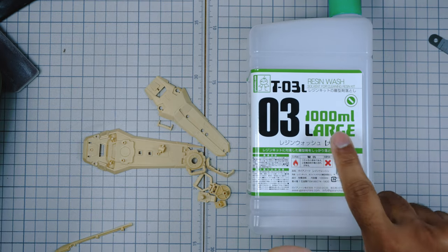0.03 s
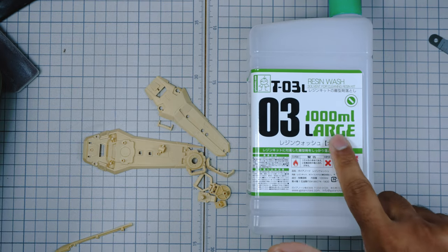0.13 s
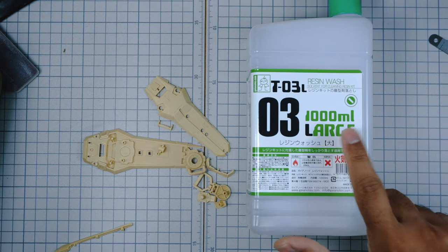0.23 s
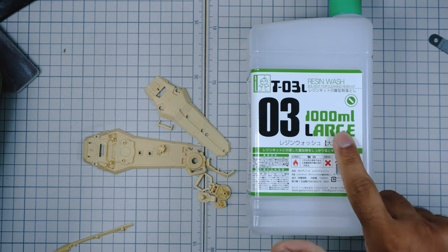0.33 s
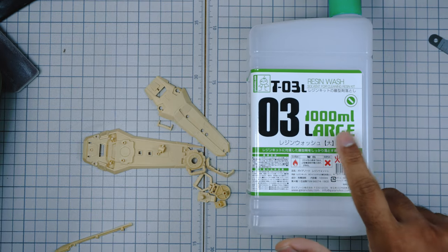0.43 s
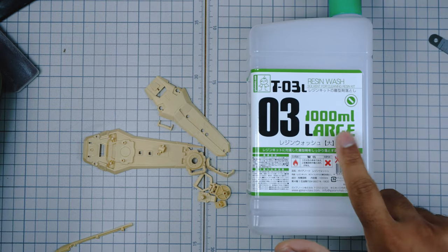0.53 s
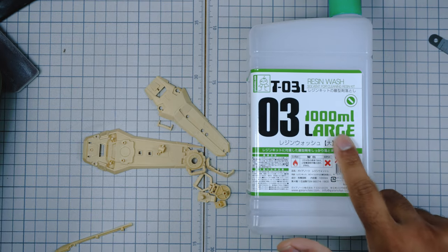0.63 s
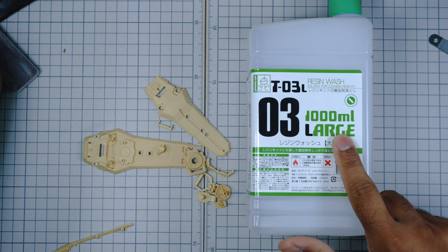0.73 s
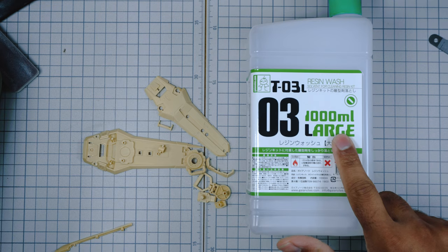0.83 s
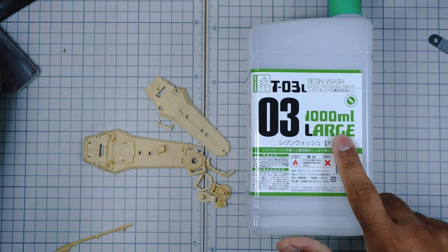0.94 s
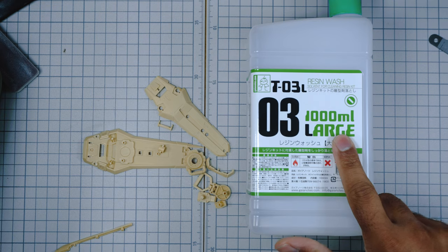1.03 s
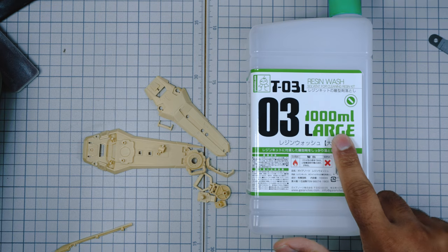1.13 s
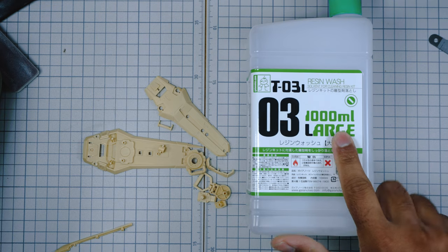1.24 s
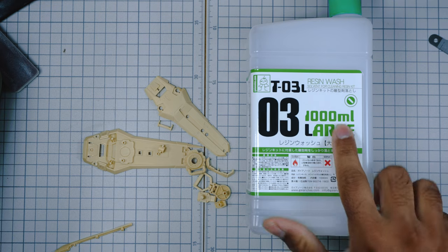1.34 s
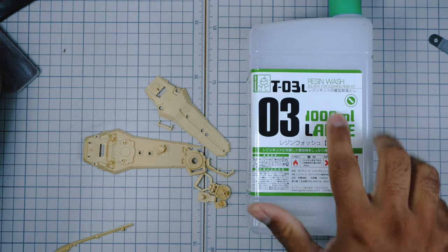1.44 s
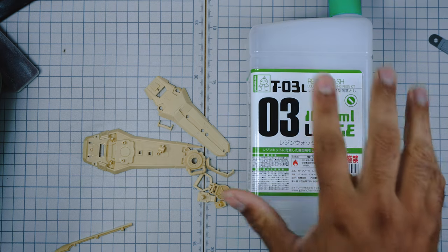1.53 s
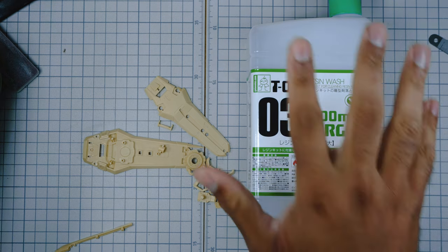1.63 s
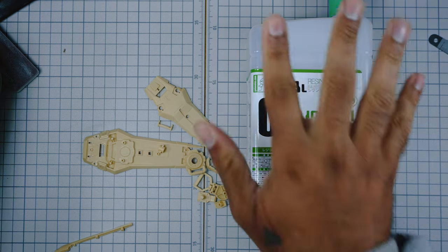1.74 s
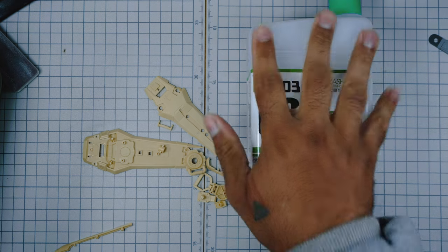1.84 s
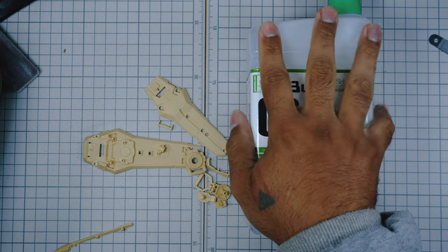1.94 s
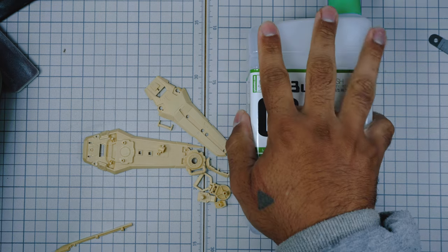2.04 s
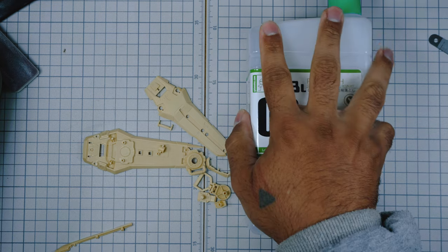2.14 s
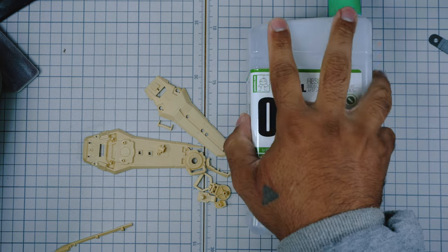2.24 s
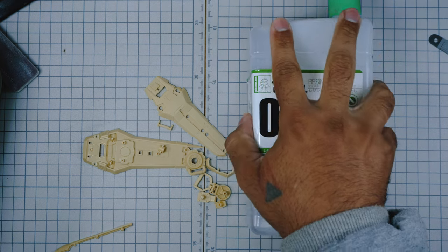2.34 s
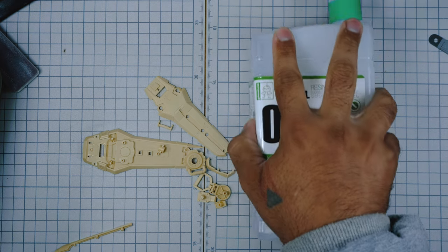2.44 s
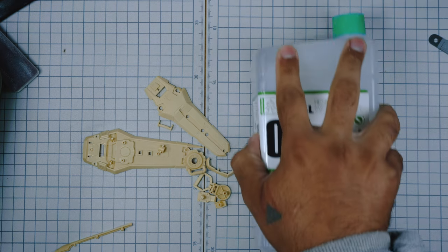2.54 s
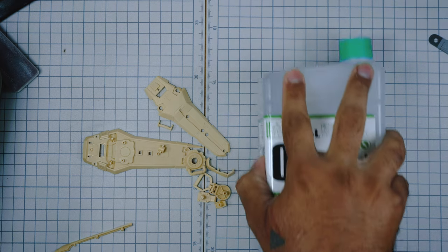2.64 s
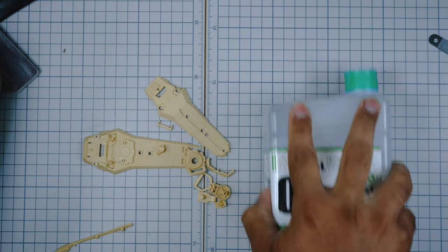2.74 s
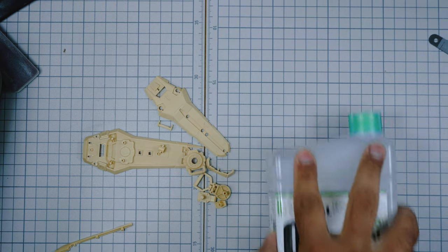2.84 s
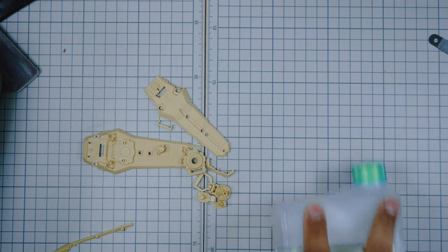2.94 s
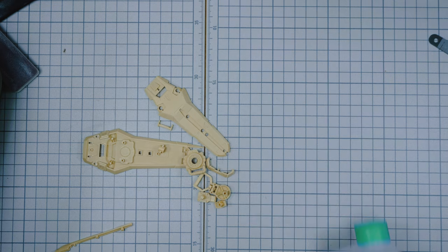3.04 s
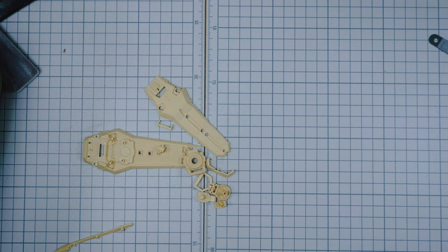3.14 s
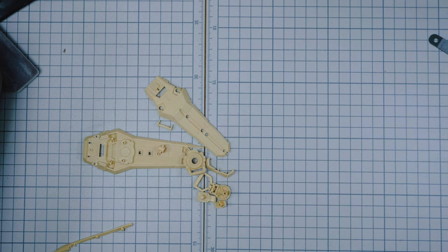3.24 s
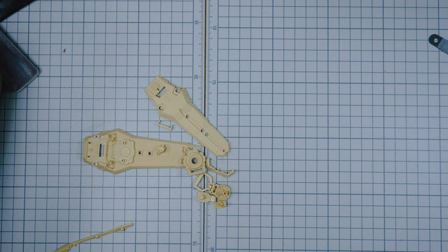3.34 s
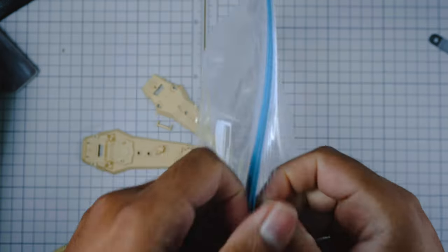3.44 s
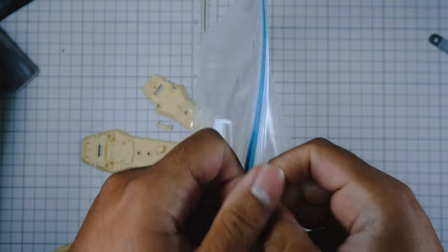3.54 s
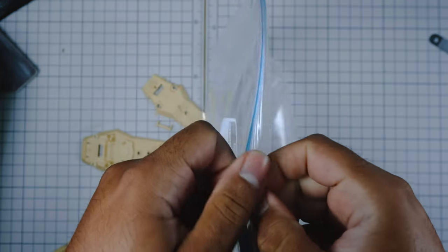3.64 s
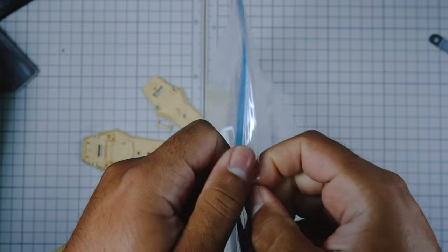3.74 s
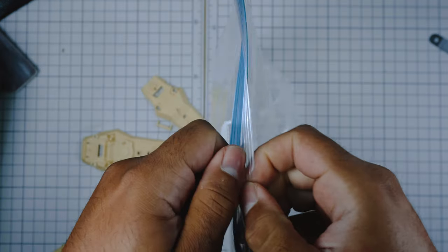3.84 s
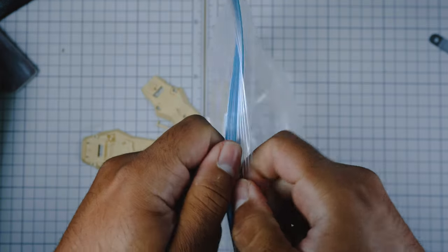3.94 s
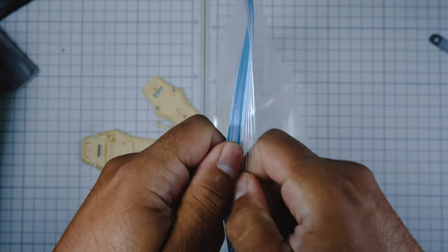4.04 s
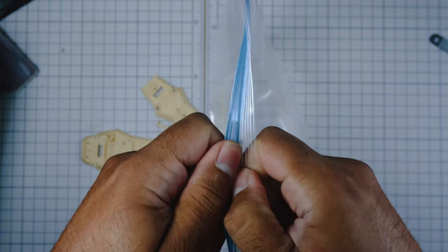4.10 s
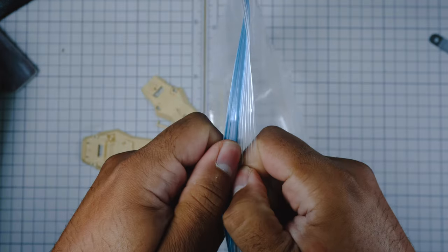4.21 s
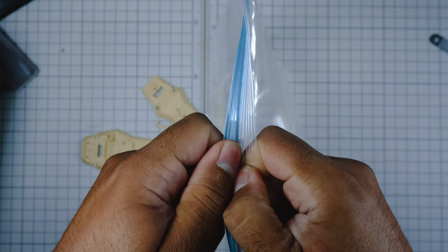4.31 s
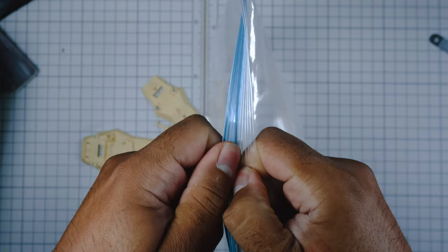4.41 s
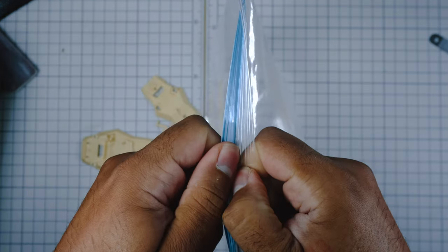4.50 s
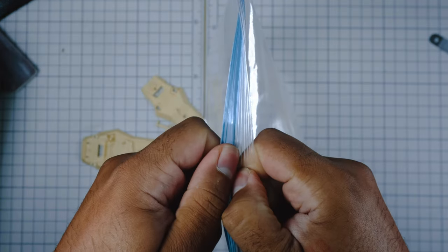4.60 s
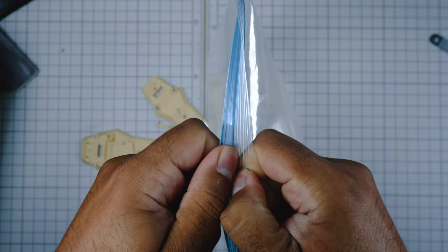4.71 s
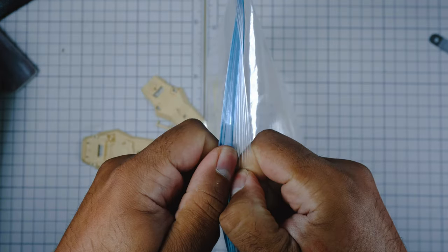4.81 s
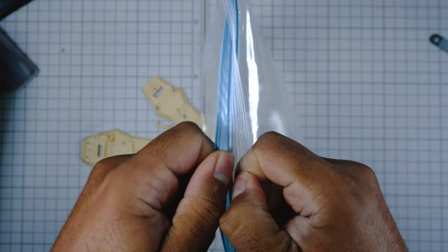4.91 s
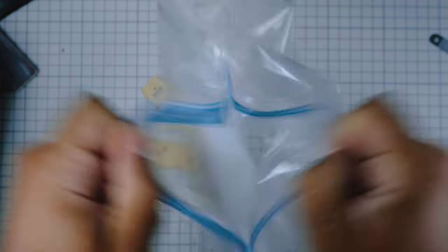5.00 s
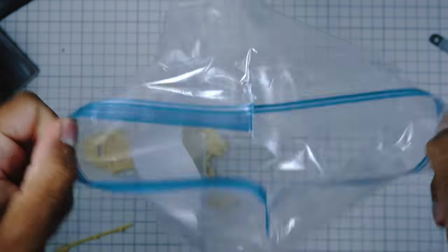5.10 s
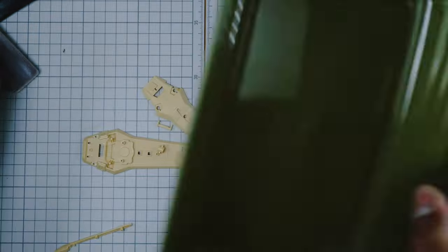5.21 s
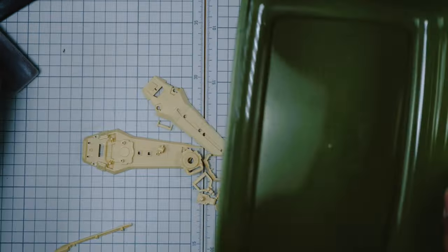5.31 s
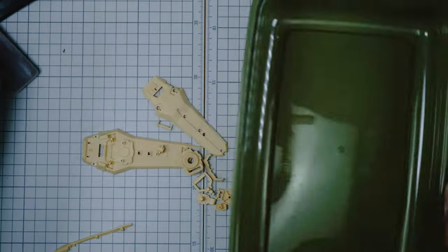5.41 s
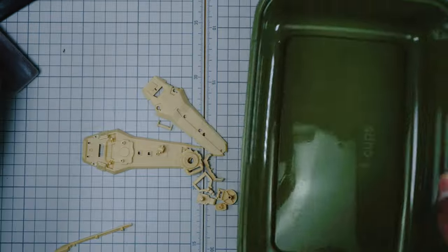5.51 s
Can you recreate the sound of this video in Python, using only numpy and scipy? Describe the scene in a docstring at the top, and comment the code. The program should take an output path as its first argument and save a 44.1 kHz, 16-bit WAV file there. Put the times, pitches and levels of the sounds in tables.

```python
"""Bottle and zip bag on a work table

Close up, a finger taps a full plastic bottle four times; a hand lands on it, the liquid heaves, and
the base scrapes away over a cutting mat. Fingers pick at a plastic zip bag, pull its seal open in one
rip of tiny snaps, then swing a tray in. Blows rock the table; a fan and mains hum sit low
in a small room."""
import sys
import numpy as np
from scipy import signal
from scipy.fft import rfft, irfft
from scipy.io import wavfile

SR = 44100
rng = np.random.default_rng(int(sys.argv[2]) if len(sys.argv) > 2 else 0)


def unload_wav(signal):
    """Save mono or channel-first audio to the path in sys.argv[1] as 16-bit WAV at rate SR, clipped to [-1, 1]."""
    wavfile.write(
        sys.argv[1],
        SR,
        np.round(np.clip(np.atleast_2d(signal).T, -1, 1) * 32767).astype(np.int16),
    )


N = 245195
TIME = np.arange(N) / SR


def gain_of(db):
    """Decibels to amplitude."""
    return 10 ** (np.asarray(db) / 20)


def unit_rms(x):
    """Scaled to rms 1."""
    return x / np.sqrt(np.mean(x ** 2) + 1e-20)


def unit_energy(x):
    """Scaled to energy 1."""
    return x / np.linalg.norm(x)


def value_at(points, hz):
    """A spectrum's value at hz, on a log-frequency axis."""
    freqs, values = np.transpose(points)
    return np.interp(np.log(hz + 1), np.log(freqs), values)


def envelope(rows):
    """Gain through (time_s, level_db) points, silent outside them."""
    times, levels = np.transpose(rows)
    return gain_of(np.interp(TIME, times, levels, left=-140, right=-140))


def strokes(rows, column=2):
    """Gain of strokes that swell to the level in one column and are 10 dB down at their ends."""
    swells_db = (row[column] - 10 * np.minimum((2 * (TIME - row[0]) / row[1]) ** 2, 20) for row in rows)
    return np.sqrt(sum(gain_of(db) ** 2 for db in swells_db))


def rise_to(s, db_per_s):
    """A steady rise that reaches gain 1 at s."""
    return gain_of(-db_per_s * np.maximum(s - TIME, 0))


def fade_after(s, db_per_s):
    """Gain 1 until s, then a steady fall."""
    return gain_of(-db_per_s * np.maximum(TIME - s, 0))


def add(mix, s, sound):
    """Mixes a sound in at time s."""
    part = mix[round(s * SR):][:len(sound)]
    part += sound[:len(part)]


def click(colour, size=4096):
    """The sharpest causal pulse with this spectrum."""
    hz = abs(np.fft.fftfreq(size, 1 / SR))
    log_gain = np.log(gain_of(value_at(colour, hz)))
    minimum_phase = np.exp(np.conj(signal.hilbert(log_gain)))
    return unit_energy(np.fft.ifft(minimum_phase).real[:size // 2])


def coloured(x, colour):
    """Passes x through a spectrum."""
    return signal.oaconvolve(x, click(colour))[:len(x)]


def noise(colour):
    """Steady coloured noise, rms 1."""
    return unit_rms(coloured(rng.standard_normal(N), colour))


def ring(modes):
    """Damped modes struck at once."""
    t = TIME[:SR // 2]
    return sum(gain_of(db - 60 * t / t60) * np.sin(2 * np.pi * hz * t) for hz, db, t60 in modes)


def cushioned(x, samples):
    """A soft contact spreads a blow in time and dulls it."""
    pad = signal.windows.hann(samples)
    return np.convolve(x, pad / pad.sum())


def burst(t60, size=2048):
    """A dying puff of noise, energy 1."""
    return unit_energy(rng.standard_normal(size) * gain_of(-60 * TIME[:size] / t60))


def friction(colour, per_s, spread_db, smooth):
    """Micro-slips of uneven size over a smooth hiss, rms 1."""
    slips = (rng.random(N) < per_s / SR) * rng.choice([-1, 1], N)
    sizes = gain_of(spread_db * np.minimum(rng.exponential(1, N), 4))
    return unit_rms(coloured(unit_rms(slips * sizes) + smooth * rng.standard_normal(N), colour))


def drift(rate_hz):
    """Slow random wander, rms 1."""
    hz = np.fft.rfftfreq(N, 1 / SR)
    return unit_rms(irfft(rfft(rng.standard_normal(N)) * np.exp(-(hz / rate_hz) ** 2), N))


# Low rush of the fan: freq_hz, gain_db
FAN_COLOUR = [(20, -1), (45, -12), (75, -5), (100, -1), (150, -9.5), (240, -5), (400, -14), (800, -22),
              (1600, -29.5), (2500, -37), (4200, -37), (7000, -42), (16000, -50)]
# Thin, high band of hiss: freq_hz, gain_db
WHINE_COLOUR = [(4500, -46.5), (5850, -11), (6150, -6.5), (6350, -3.5), (6700, -16.5), (8000, -47.5)]
# Tones of the hum: pitch_hz, level_db
HUM_TONES = [(33, -57.5), (59.3, -56), (97.5, -65.5), (118.4, -64), (226, -70.5)]


def room_tone():
    """A bed of fan noise, faint whine and wavering mains hum."""
    fan = gain_of(-58) * noise(FAN_COLOUR)
    whine = gain_of(-85.5) * noise(WHINE_COLOUR)
    hum = np.zeros(N)
    for hz, db in HUM_TONES:
        phase = 2 * np.pi * (hz * TIME + rng.random()) + 0.19 * drift(rate_hz=2.7)
        hum += gain_of(db) * np.sqrt(2) * np.sin(phase)
    return fan + whine + hum


def table_sway(rate_hz=16, t60=2.3):
    """The table never quite rests on its legs; each blow pushes it down and sets it rocking."""
    rocking = -np.sin(2 * np.pi * rate_hz * TIME)
    kick = rocking * gain_of(-60 * TIME / t60)
    out = gain_of(-57.5) * rocking
    for s, thud_db, _ in FINGER_TAPS:
        add(out, s, gain_of(thud_db - 38) * kick)
    add(out, HAND_HITS[0][0], gain_of(-45) * kick)
    return out


# Four firm taps and three light touches: start_s, thud_db, tick_db
FINGER_TAPS = [(0.1324, -4, -10), (0.193, -18.5, -44), (0.3187, -0.5, -0.5), (0.5060, 0, -3.5),
               (0.5609, -17.5, -47), (0.6913, 1.5, -5), (1.244, -18, -45)]
# Bright tick of the nail: freq_hz, gain_db
NAIL_COLOUR = [(100, -16), (600, -27), (850, -23), (1200, -5.5), (2450, 3), (3300, -6.5), (4400, -4.5),
               (7500, -14.5), (9500, -15), (11500, -14), (13500, -18), (16000, -22)]
# Ring of the label face and the table under it: pitch_hz, level_db, t60_s
THUD_MODES = [(74.3, -5, 0.51), (142, -4.5, 0.076), (184, -1.5, 0.036), (252, -8.5, 0.13), (312, 4, 0.017),
              (425, -4.5, .07), (512, -23, 0.27), (574, -16, 0.15), (737, -8, 0.036), (1046, -10, 0.023),
              (1240, -2, 0.02), (1300, -24, 0.023), (1540, -6.5, 0.024), (1860, -13, 0.04),
              (2260, -8, 0.018), (4130, -11, 0.012), (5200, -13, 0.013)]


def bottle_taps():
    """The nail ticks and the liquid-damped face rings briefly; the soft fingertip presses in just after."""
    thud = gain_of(-35) * -ring(THUD_MODES)
    tick = gain_of(-16.5) * click(NAIL_COLOUR)
    press = gain_of(-9.5) * cushioned(thud, samples=96)
    out = np.zeros(N)
    for s, thud_db, tick_db in FINGER_TAPS:
        add(out, s, gain_of(tick_db) * tick)
        add(out, s, gain_of(thud_db) * thud)
        add(out, s + 0.00429, gain_of(thud_db) * press)
    return out


# Skin and sleeve stroking the bottle: middle_s, length_s, brush_db, swish_db
SKIN_STROKES = [(.6, 0.11, -77, -76), (1.4, 0.25, -67.5, -71), (1.9, 0.22, -59, -88),
                (1.955, 0.045, -57, -65), (2.13, 0.25, -68.5, -79), (2.25, 0.1, -64, -70),
                (3.37, 0.044, -64, -74)]
# Soft brush of skin: freq_hz, gain_db
SKIN_COLOUR = [(500, 3.5), (1800, 3), (3600, 5.5), (6000, 1), (8000, -9), (12000, -7.5), (16000, -17)]
# Finest crackle of plastic, for bottle and bag: freq_hz, gain_db
FIZZ_COLOUR = [(4000, -20), (7500, 0), (11000, -2), (14000, -3.5), (16000, -5)]


def skin_brush(hiss_stops_s=3.4):
    """Skin moving on plastic hisses, with a fine swish on top; a faint steady hiss stops abruptly."""
    faint_hiss = gain_of(-78.5) * (TIME < hiss_stops_s)
    touch = np.hypot(strokes(SKIN_STROKES), faint_hiss)
    swish = strokes(SKIN_STROKES, column=3) * friction(FIZZ_COLOUR, per_s=2500, spread_db=6, smooth=1)
    return touch * friction(SKIN_COLOUR, per_s=1500, spread_db=3, smooth=0.73) + swish


# The hand landing on the bottle: start_s, slap_db, push_db
HAND_HITS = [(1.9038, -11, -7.5), (1.9064, -5.5, 1), (1.9118, -1, -8), (1.9164, -12, -3.5)]
# Smack of skin: freq_hz, gain_db
SLAP_COLOUR = [(200, -6), (900, -11), (1800, 7.5), (2500, -6.5), (3400, 1), (5500, -10.5), (10000, -10.5),
               (16000, -19)]
# Boom of the broad wall, damped by the palm: pitch_hz, level_db, t60_s
WALL_MODES = [(98, -21, .12), (156, -28, .3), (238, -14, .1), (307, -14, .1), (385, -5, .05),
              (418, 1, .065), (511, -4, .08), (560, -11, .04), (711, -19, .06)]


def hand_landing():
    """Fingers and palm slap the wall in turn; the soft flesh pushes it and the bottle booms."""
    boom = gain_of(-24.5) * cushioned(ring(WALL_MODES), samples=48)
    out = np.zeros(N)
    for s, slap_db, push_db in HAND_HITS:
        slap = unit_energy(coloured(burst(t60=0.0092), SLAP_COLOUR))
        add(out, s, gain_of(slap_db - 6.5) * slap)
        add(out, s, gain_of(push_db) * boom)
    return out


# Swell of the liquid: time_s, level_db
SLOSH_CURVE = [(1.94, -32.5), (1.98, -32), (2.02, -36), (2.055, -34.5), (2.085, -44), (2.17, -42.5),
               (2.5, -50)]
# Its sub-bass weight: freq_hz, gain_db
SLOSH_COLOUR = [(12, -17), (30, 5.5), (60, -19), (160, -22), (350, -60), (1000, -99)]


def slosh():
    """The liquid heaves under the hand: a deep wobble after the blow."""
    return envelope(SLOSH_CURVE) * noise(SLOSH_COLOUR)


# How hard the base scrapes the mat: time_s, level_db
SCRAPE_CURVE = [(2.3, -85.5), (2.48, -71.5), (2.55, -59), (2.85, -43), (3.06, -35.5), (3.11, -41.5),
                (3.17, -39.5), (3.205, -44.5), (3.235, -39), (3.31, -55.5), (3.35, -72)]
# Hollow note of the bottle: freq_hz, gain_db
HOLLOW_COLOUR = [(120, -15), (300, -6.5), (430, 7), (640, 2.5), (760, 2), (1200, 1.5), (1500, -26.5),
                 (2000, -39.5)]
# Rasp of its base: freq_hz, gain_db
RASP_COLOUR = [(1000, -20.5), (1350, -4.5), (1450, -5), (1650, -0.5), (1820, -10.5), (2000, -10.5),
               (2600, -36.5)]
# Hiss of the mat's surface: freq_hz, gain_db
MAT_COLOUR = [(900, -22), (2000, -7), (3100, 1), (4200, -3), (5200, -3), (6800, -16), (8600, -15),
              (10500, -23), (13000, -29), (16000, -33)]
# The closing grip nudges the bottle: middle_s, length_s, level_db
GRIP_NUDGE = [(2.26, 0.23, -67.5)]


def bottle_drag(flat_until_s=2.632, leaves_mat_s=2.896):
    """The base scrapes with uneven pressure; as it lifts, the hollow note fades first, then the rasp."""
    pressure = gain_of(drift(rate_hz=29))
    scrape = envelope(SCRAPE_CURVE)
    lying_flat = gain_of(8.5) * scrape * fade_after(flat_until_s, db_per_s=43.5)
    contact = gain_of(2.5) * scrape * fade_after(leaves_mat_s, db_per_s=33) + strokes(GRIP_NUDGE)
    hollow = lying_flat * friction(HOLLOW_COLOUR, per_s=1400, spread_db=5, smooth=0.63)
    rasp = contact * friction(RASP_COLOUR, per_s=1500, spread_db=-1.5, smooth=1)
    hiss = gain_of(1) * scrape * friction(MAT_COLOUR, per_s=3700, spread_db=-1.5, smooth=0.8)
    direct = pressure * (hollow + rasp + hiss)
    # The reflection off the mat comes later as the bottle moves away.
    delay_s = np.interp(TIME, [2.5, 3.3], [0.0005, 0.0012])
    reflection = 0.13 * np.interp(TIME - delay_s, TIME, direct)
    return gain_of(-0.5) * (direct + reflection)


# Knocks along the drag: start_s, level_db, pitch_hz
MAT_BUMPS = [(2.527, -42, 230), (2.544, -42.5, 199), (2.970, -38.5, 570), (2.984, -40.5, 606),
             (3.058, -32.5, 3450), (3.23, -34, 3620), (3.292, -36.5, 1430), (3.296, -42, 405)]


def bottle_bumps():
    """The bottle bumps on the mat in short, gritty knocks."""
    out = np.zeros(N)
    for s, db, hz in MAT_BUMPS:
        knock = signal.fftconvolve(burst(t60=0.04), ring([(hz, 0, 0.008)]))
        add(out, s, gain_of(db + 23.5) * unit_energy(knock))
    return out


# Sharp crack of the bag's film: freq_hz, gain_db
SNAP_COLOUR = [(150, -36.5), (400, -7), (900, -6.5), (1600, -0.5), (3000, 3), (4500, 14), (6500, 3),
               (9000, -6), (16000, -31)]


def snaps(rows, body_db, crack_share, treble_db, ring_t60, shivers, shiver_t60):
    """Each snap cracks and jerks a few cycles from the film; the shiver changes from first to last."""
    out, crack, tick = np.zeros(N), click(SNAP_COLOUR), click(FIZZ_COLOUR)
    for (s, db, hz), shiver in zip(rows, np.linspace(*shivers, len(rows))):
        tone = ring([(hz, 0, ring_t60)])[:len(crack)]
        patch = unit_energy(signal.fftconvolve(tone, crack)[:len(crack)])
        jerk = shiver * burst(shiver_t60)
        jerk[0] += 1  # a clean impulse leads the noisy shiver
        body = signal.fftconvolve(patch + crack_share * crack, jerk)
        treble = signal.fftconvolve(tick, burst(t60=0.005))
        add(out, s, gain_of(db + body_db) * unit_energy(body))
        add(out, s, gain_of(db + treble_db) * unit_energy(treble))
    return out


def crinkles(rubbing, count=18, centre_hz=2300):
    """Small creases, likelier and louder under harder rubbing: start_s, level_db, pitch_hz."""
    shares = (np.arange(count) + rng.random(count)) / count
    times = np.interp(shares, np.cumsum(rubbing) / rubbing.sum(), TIME)
    size, pitch = rng.standard_normal((count, 2)).T
    pressed_db = 10 * np.log10(np.interp(times, TIME, rubbing) / rubbing.max())
    return list(zip(times, -52 + pressed_db + 2.7 * size, centre_hz * 2 ** (0.55 * pitch)))


# Fingers rubbing the film: middle_s, length_s, rustle_db, fizz_db
FILM_RUBS = [(3.62, .04, -59.5, -68), (3.73, 0.44, -62.5, -73), (3.718, 0.044, -55.5, -64),
             (3.812, .06, -54.5, -61.5), (3.95, .05, -53, -63), (4.0, .06, -55, -73),
             (4.088, 0.056, -57, -69), (4.2, 0.092, -68, -81), (4.42, 0.099, -66, -87),
             (4.65, .09, -70, -79), (4.958, .024, -61.5, -83), (5.2, .055, -56.5, -68)]
# Midrange rustle of the film: freq_hz, gain_db
RUSTLE_COLOUR = [(300, -22), (700, -3.5), (1300, -2.5), (2500, -5), (4500, -4.5), (6500, -10.5),
                 (9000, -26)]
# The loudest crease pops: start_s, level_db, pitch_hz
CREASE_POPS = [(3.504, -50.5, 1400), (3.7088, -60, 1500), (3.7867, -46.5, 4200), (3.8155, -47, 2950),
               (3.888, -47, 4770), (3.9924, -49.5, 2620), (4.0302, -49, 2530), (4.0755, -45, 4000),
               (4.0909, -45.5, 4400), (4.1287, -50.5, 2800), (4.3527, -52, 1880), (4.372, -48, 2750),
               (4.4232, -57, 2700), (4.574, -52, 1550), (4.666, -56, 1696), (5.1827, -32.5, 5200),
               (5.1919, -32.5, 2830)]


def bag_fumbling():
    """Fingers feel for the lips of the bag: the film rustles and its creases pop."""
    rubbing = strokes(FILM_RUBS)
    rustle = gain_of(0.5) * rubbing * friction(RUSTLE_COLOUR, per_s=660, spread_db=3, smooth=0.88)
    fizz = strokes(FILM_RUBS, column=3) * friction(FIZZ_COLOUR, per_s=900, spread_db=3.2, smooth=0.9)
    grip = gain_of(2.3 * drift(rate_hz=55))  # the film sticks and slips in clumps
    pops = snaps(crinkles(rubbing) + CREASE_POPS, body_db=19, crack_share=0.76, treble_db=2,
                 ring_t60=0.0014, shivers=(2.4, 1.0), shiver_t60=0.028)
    return grip * (rustle + fizz) + pops


# The seal giving way in lurches: start_s, level_db, length_s
SEAL_LURCHES = [(4.968, -22.5, 0.0029), (4.9748, -20, .002), (4.9783, -14, .003), (4.9853, -11.5, 0.0028),
                (4.9948, -12, .004), (5.0012, -17, .008), (5.0122, -17.5, 0.0047), (5.016, -15.5, 0.0066),
                (5.033, -17, 0.01), (5.0458, -16.5, .004), (5.056, -21, 0.0031), (5.0615, -17, 0.0032),
                (5.0685, -13, 0.0061), (5.08, -16, 0.0061), (5.091, -14.5, .002), (5.1011, -17, .004),
                (5.1111, -18.5, 0.015), (5.124, -23, 0.0045), (5.1373, -23, 0.0015)]
# Short ringing tones that colour the rip's snaps: pitch_hz, level_db, t60_s
RIP_TONES = [(1010, -2.5, .045), (1694, 2.5, .12), (2700, -7.5, 0.11), (2930, 5, .05), (3920, -3.5, 0.063)]


def seal_rip(pulls_s=(4.965, 5.06), taut_hz=4320, slack_octaves_per_s=9.2):
    """Each lurch of the seal frees a fading run of snaps, coloured by short ringing tones."""
    count, gap_s, jitter_s = 5, 0.002, 0.00043
    rows = []
    for start, db, length in SEAL_LURCHES:
        jitter, pitch = rng.standard_normal((2, count))
        after_s = abs(np.arange(count) * gap_s + jitter_s * (jitter - jitter[0]))
        fade_db = 10.5 * np.minimum(after_s / length, 2) ** 2
        # Each pull draws the film taut; the pitch sinks as it slackens.
        since_pull_s = start - max([s for s in pulls_s if s <= start], default=start)
        hz = taut_hz * 2 ** (0.12 * pitch - slack_octaves_per_s * since_pull_s)
        rows += zip(start + after_s, db - fade_db, hz)
    seal = snaps(rows, body_db=18.5, crack_share=1.18, treble_db=11,
                 ring_t60=0.002, shivers=(0.5, 1.8), shiver_t60=0.008)
    tones = gain_of(-25) * signal.fftconvolve(seal, unit_energy(ring(RIP_TONES)))[:N]
    return seal + tones


# Flutter of slack film: freq_hz, gain_db
FLUTTER_COLOUR = [(400, -21.5), (950, 7), (1300, -4), (1650, 3.5), (2100, -6.5), (2900, 2.5), (4200, -1),
                  (6500, -9), (10000, -11), (16000, -22)]
# Low whoosh of air, for bag and tray: freq_hz, gain_db
AIR_COLOUR = [(50, -0.5), (110, 4.5), (180, -2.5), (300, 5.5), (500, -3), (900, -13), (1500, -30.5)]


def bag_opening(parts_s=4.988, wide_s=5.123):
    """The slackening film flutters and the widening mouth puffs air; both die once it is wide open."""
    opening = rise_to(parts_s, db_per_s=901.5)
    shake = gain_of(-27.5) * rise_to(wide_s, db_per_s=14) * fade_after(wide_s, db_per_s=390)
    puff = gain_of(-32) * rise_to(wide_s, db_per_s=124) * fade_after(wide_s, db_per_s=480)
    flutter = shake * friction(FLUTTER_COLOUR, per_s=1800, spread_db=7, smooth=0.51)
    air = puff * friction(AIR_COLOUR, per_s=560, spread_db=6.5, smooth=0.65)
    return opening * (flutter + air)


# Pass of the tray: middle_s, length_s, level_db
TRAY_PASS = [(5.39, .36, -64)]


def tray_swing():
    """A tray swung in over the table stirs the air."""
    return strokes(TRAY_PASS) * friction(AIR_COLOUR, per_s=560, spread_db=6.5, smooth=0.65)


# Short tail of the small room: freq_hz, t60_s
ROOM_DECAY = [(150, 0.303), (400, 0.24), (1000, 0.14), (2800, 0.18), (7000, 0.096), (16000, 0.021)]


def room_reverb(x, size=16384):
    """Dense reflections from close walls, the treble dying first."""
    echoes = rng.standard_normal(size) * (TIME[:size] > 0.004)
    hz, t, spectra = signal.stft(echoes, SR, nperseg=256)
    decay = gain_of(-60 * t / value_at(ROOM_DECAY, hz)[:, None])
    tail = signal.istft(spectra * decay, SR, nperseg=256)[1]
    return signal.fftconvolve(x, unit_energy(tail))[:N]


def scene():
    """Bottle, bag and tray in mono over the room tone, each group with its own reverb send."""
    taps, landing = bottle_taps(), hand_landing()
    handling = bottle_drag() + bottle_bumps() + skin_brush()
    bag_and_tray = bag_fumbling() + seal_rip() + bag_opening() + tray_swing()
    sends_db = [(taps, -15.5), (landing, -14), (handling, -15), (bag_and_tray, -20)]
    reverb = room_reverb(sum(gain_of(db) * sound for sound, db in sends_db))
    return (taps + landing + slosh() + handling + bag_and_tray + reverb + room_tone() + table_sway())[None]


def record(dry, ceiling=0.65, cutoff_hz=16100):
    """Soft clipping rounds off the loudest peaks; a steep low-pass trims the top."""
    rounded = dry / (1 + (dry / ceiling) ** 4) ** (1 / 4)
    low_pass = signal.firwin(511, cutoff_hz, window=("kaiser", 9), fs=SR)
    return signal.oaconvolve(rounded, low_pass[None], "same")


dry = scene()
out = record(dry)
unload_wav(out)
```